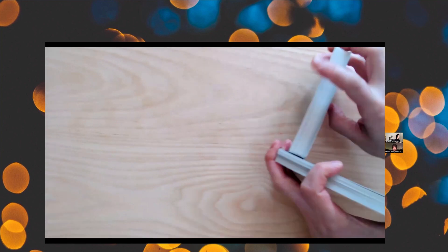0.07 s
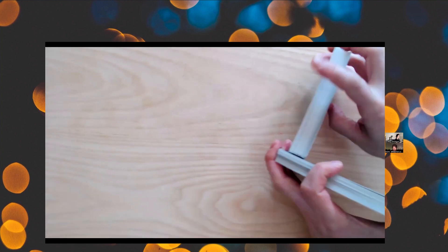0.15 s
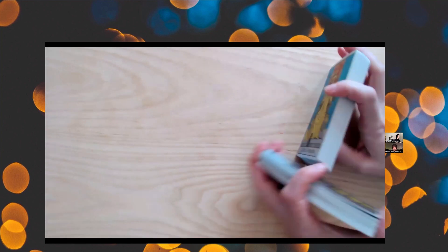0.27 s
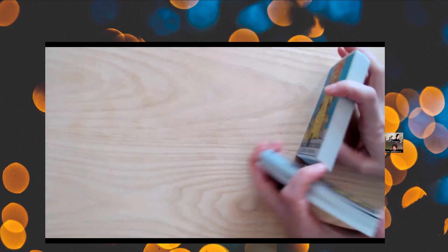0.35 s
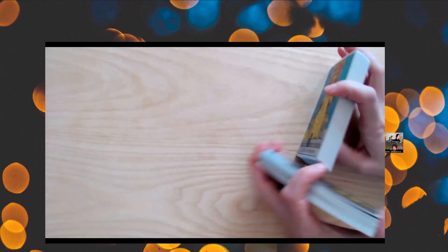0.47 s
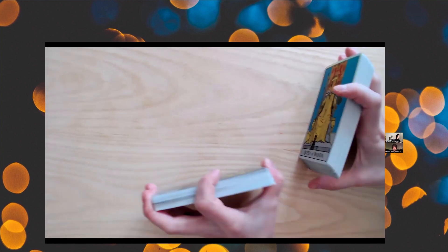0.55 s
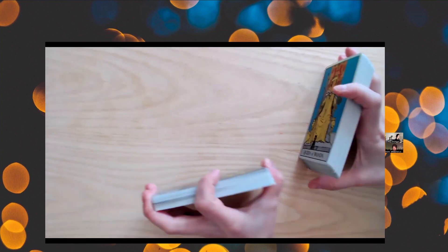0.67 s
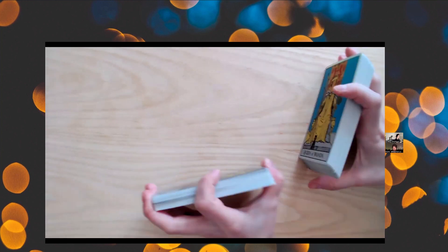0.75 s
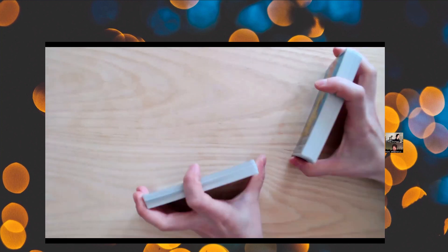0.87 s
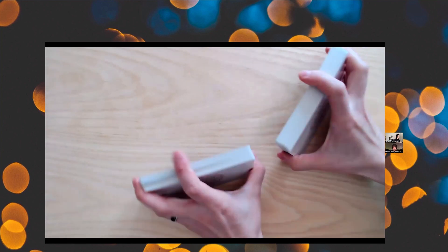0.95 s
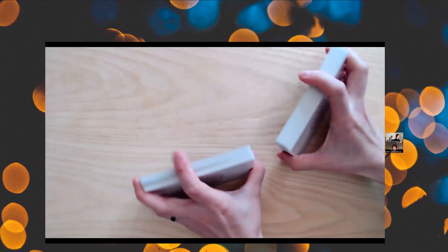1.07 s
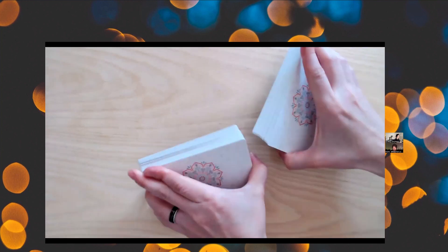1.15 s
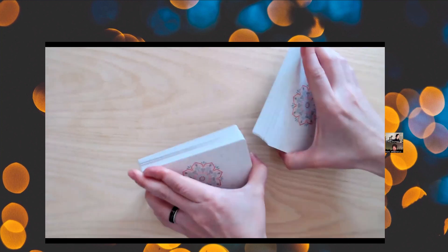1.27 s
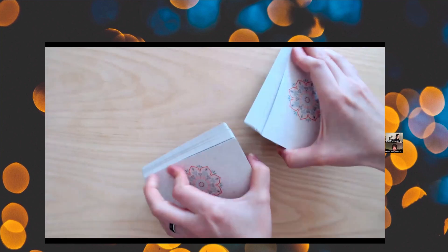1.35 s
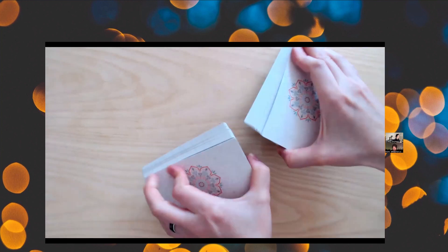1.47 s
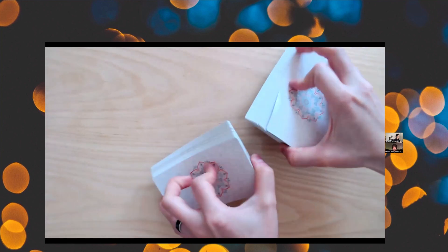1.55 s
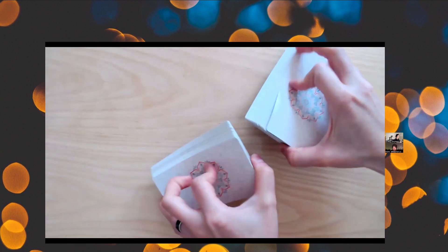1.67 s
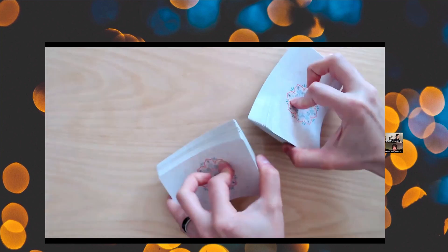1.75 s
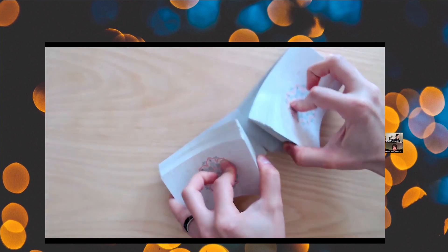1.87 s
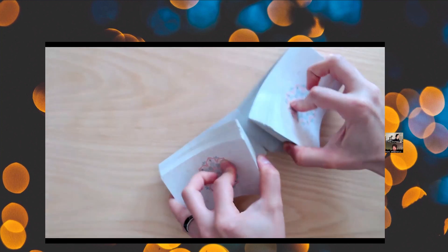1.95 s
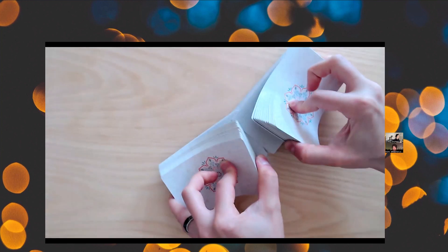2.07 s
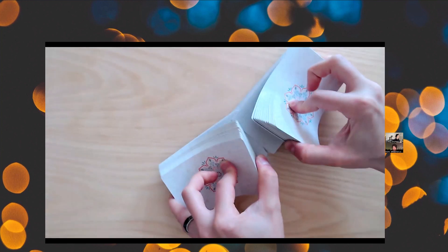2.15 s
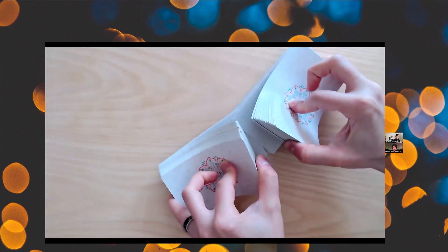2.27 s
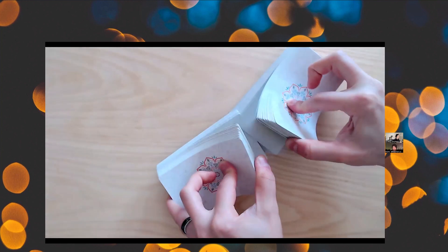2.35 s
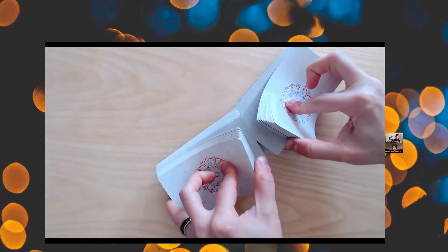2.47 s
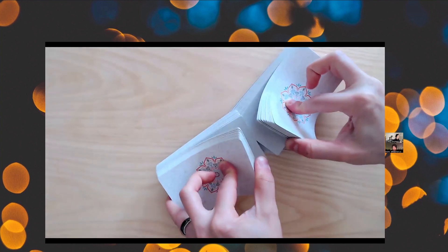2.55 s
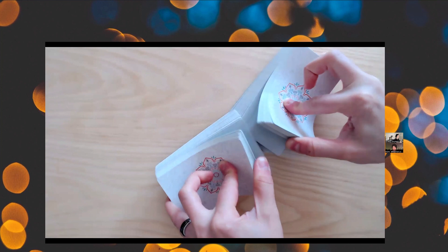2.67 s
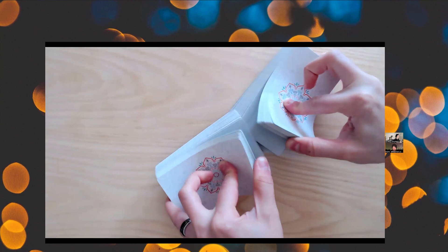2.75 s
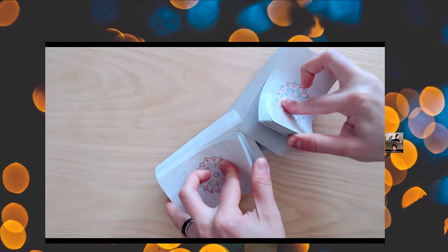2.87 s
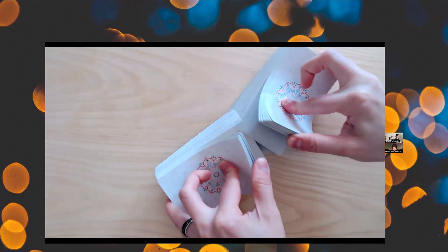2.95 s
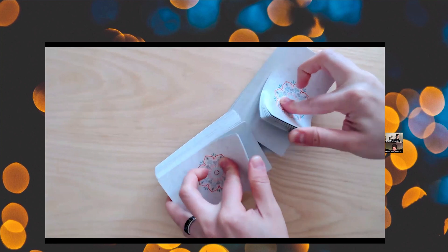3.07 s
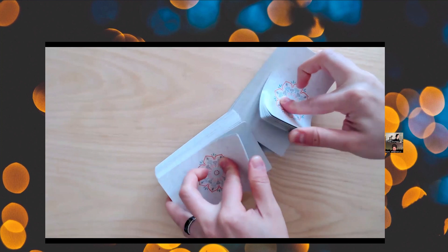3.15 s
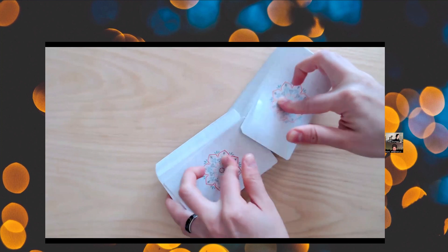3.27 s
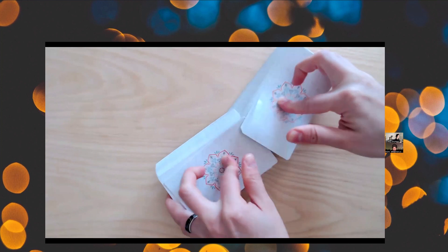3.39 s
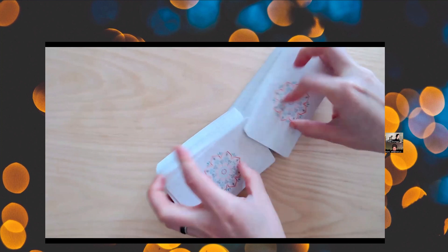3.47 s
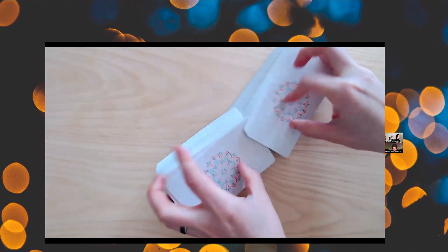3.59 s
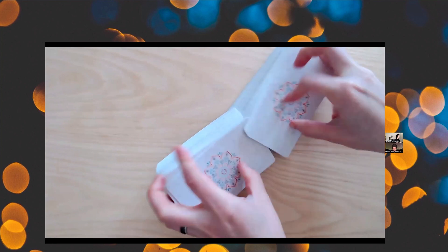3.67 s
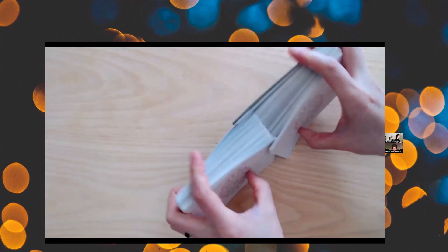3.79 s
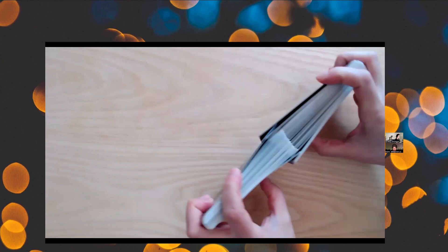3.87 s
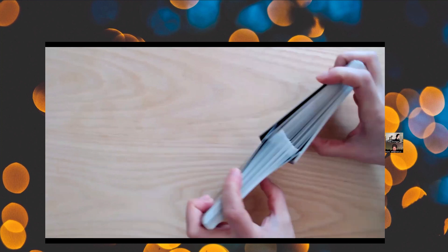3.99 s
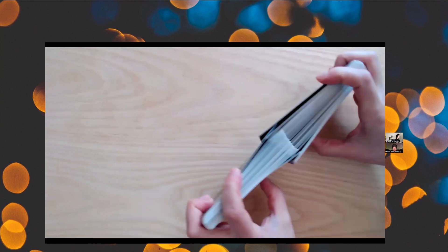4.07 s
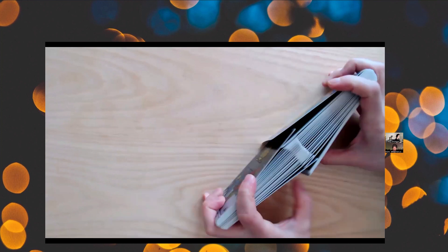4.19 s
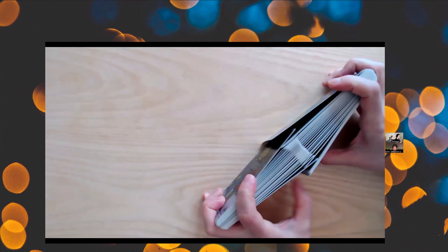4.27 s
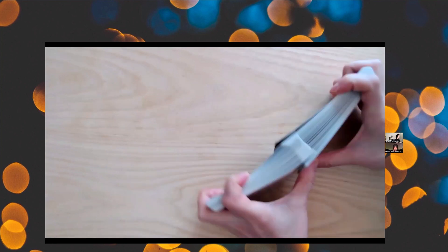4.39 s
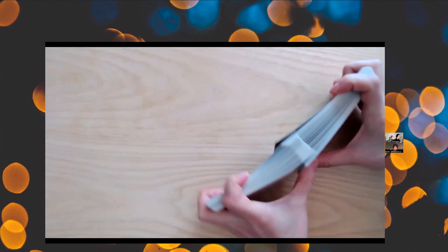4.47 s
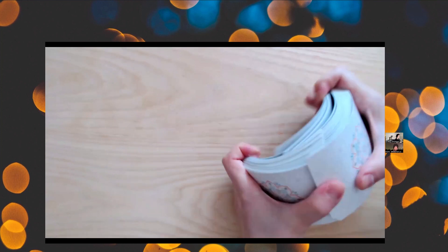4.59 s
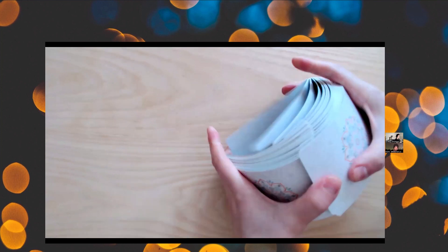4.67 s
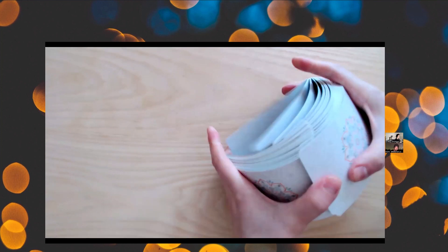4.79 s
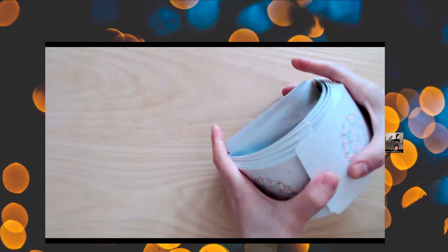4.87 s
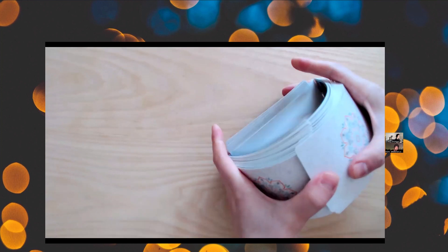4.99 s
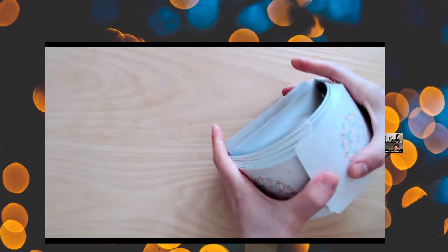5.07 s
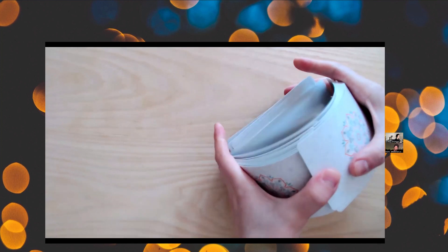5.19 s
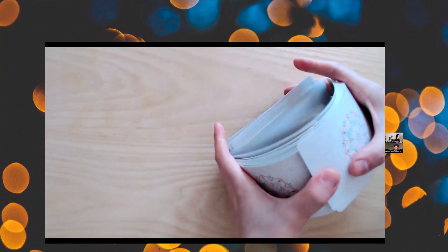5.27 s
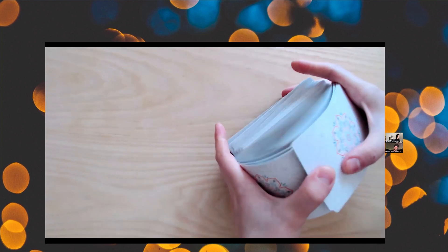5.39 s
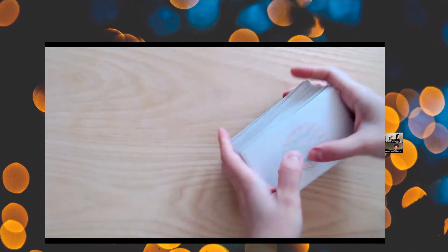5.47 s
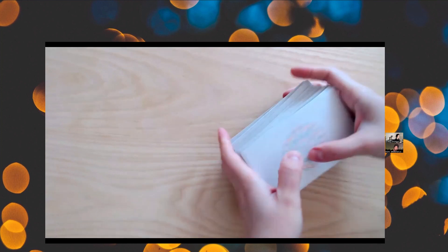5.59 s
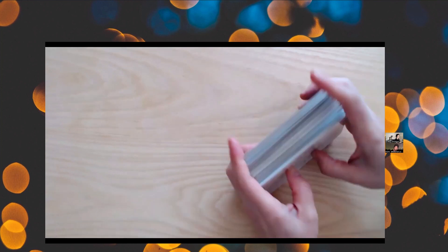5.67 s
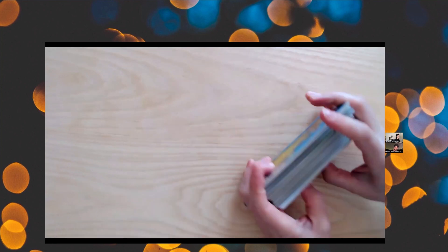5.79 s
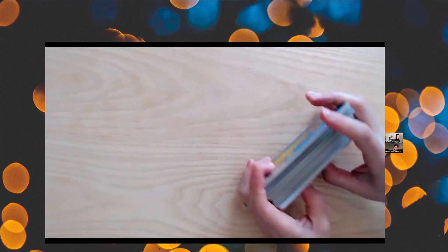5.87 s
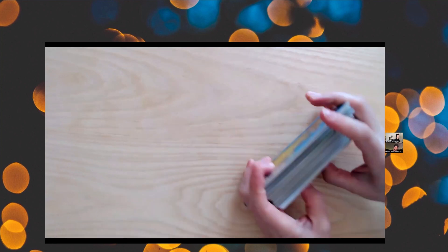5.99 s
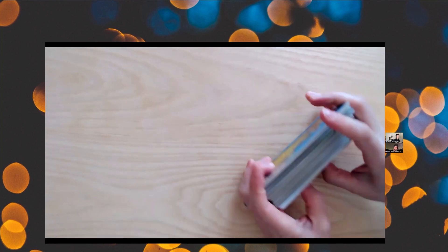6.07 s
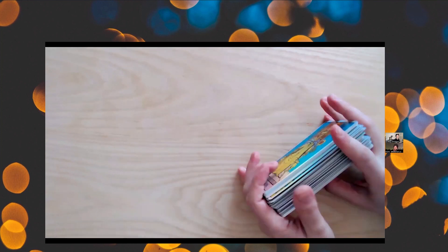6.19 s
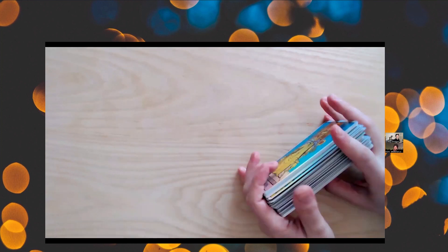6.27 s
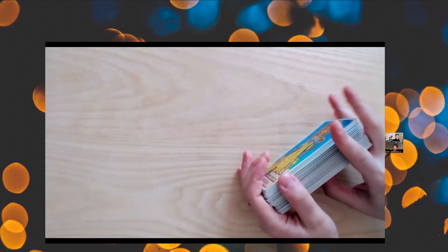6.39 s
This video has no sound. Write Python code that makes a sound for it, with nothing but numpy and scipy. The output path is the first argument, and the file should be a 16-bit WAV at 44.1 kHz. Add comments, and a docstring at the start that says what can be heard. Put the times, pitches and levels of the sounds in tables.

```python
"""A small bare room with a wooden table: large cards are cut, riffled and squared close to the microphone.
Card edges snap and packs knock: short rattles of noise ringing flaps of air and card stock, with thuds
from the modes of the table top. Faces slide as grainy shaped noise, chirp as wavering tones, and air
swishes through the bowed deck as resonant noise. Sparse reflections answer all of it."""
import sys
import numpy as np
from scipy import signal
from scipy.fft import rfft, irfft
from scipy.io import wavfile
from scipy.ndimage import uniform_filter1d

SR = 44100
rng = np.random.default_rng(int(sys.argv[2]) if len(sys.argv) > 2 else 0)


def store_pcm(level_fs):
    """Save levels as 16-bit WAV."""
    pcm = np.round(np.clip(level_fs, -1, 1) * 32767).astype(np.int16)
    wavfile.write(sys.argv[1], SR, np.atleast_2d(pcm).T)


N = 284004


def amp(db):
    """Decibels to gain."""
    return 10 ** (np.asarray(db) / 20)


def evened(x):
    """Scales to rms 1."""
    return x / np.sqrt(np.mean(x ** 2) + 1e-20)


def peaked(x):
    """Scales to peak 1."""
    return x / (abs(x).max() + 1e-12)


def read(points, hz):
    """Reads a frequency table on a log-frequency axis."""
    f, value = np.transpose(points)
    return np.interp(np.log(hz + 1), np.log(f + 1), value)


def lowpass(x, order, hz):
    """Rolls off the treble above a corner frequency."""
    return signal.sosfilt(signal.butter(order, hz, output="sos", fs=SR), x)


def ring(x, hz, width):
    """A steep resonance of gain near 1 at its centre: the same pole pair passed twice."""
    r = np.exp(-np.pi * width / SR)
    poles = [1 - r, 0, -r * (1 - r), 1, -2 * r * np.cos(2 * np.pi * hz / SR), r * r]
    return signal.sosfilt([poles, poles], x)


RISE_DB_PER_S, FALL_DB_PER_S = 434.5, 100


def gesture(start, hold, fall):
    """A hand movement in dB: straight attack, hold and release."""
    t = np.arange(N) / SR - start
    return np.minimum(RISE_DB_PER_S * t, 0) - fall * np.maximum(t - hold, 0)


# how long the bare room rings: (f/Hz, t60/s)
ROOM_DECAY = [(100, 0.23), (300, 0.61), (1000, 0.49), (3000, 0.42), (6000, 0.6), (12000, 0.19)]


def room(x):
    """Sparse reflections that build up over the first walls, each band dying at its own speed."""
    taps = np.zeros(SR)
    at = np.arange(150, SR - 20, 20)
    taps[at + rng.integers(0, 20, len(at))] = rng.choice([-1., 1.], len(at))
    taps *= 1 - 0.72 * np.exp(-(np.arange(SR) / SR / 0.03) ** 6)  # the walls answer late
    hz, t, z = signal.stft(taps, SR, nperseg=256)
    decay = amp(-60 * t / read(ROOM_DECAY, hz)[:, None])
    tail = signal.istft(z * decay, SR, nperseg=256)[1]
    return signal.fftconvolve(x, tail / np.linalg.norm(tail))[:N]


# low modes of the wooden table top: (f/Hz, level/dB, t60/s)
TABLE_MODES = [(73.4, -31, 0.18), (123.6, -9.5, 0.39), (146.3, -7, 0.13), (186.2, -8.5, 0.099),
               (237, -10, 0.21), (298, -2, 0.032), (361.7, 1.5, 0.056), (449, -2.5, 0.037),
               (547, -4, 0.061), (720, -8, 0.043), (861, -0.5, 0.1)]


def table(push):
    """Soft pushes ring the low modes of the table top."""
    t = np.arange(SR // 3) / SR
    modes = sum(amp(db - 60 * t / t60) * np.sin(2 * np.pi * hz * t) for hz, db, t60 in TABLE_MODES)
    thud = peaked(np.convolve(modes, np.hanning(48)))  # a rounded push dulls the thud
    return signal.oaconvolve(push, thud)[:N]


# a palm or the flat of the deck bumps the table: (t/s, push level/dB)
BUMP_TIMES = [(3.409, -46), (3.722, -37), (3.737, -44), (5.555, -38), (5.57, -38), (5.596, -27.5),
              (6.268, -39)]
BUMP_MS = 3.2  # a soft contact stirs only the lowest modes


def bumps():
    """Slow rounded pushes on the table top."""
    push, t = np.zeros(N), np.arange(0, BUMP_MS / 1000, 1 / SR)
    shape = np.sin(np.pi * t * 1000 / BUMP_MS) ** 2
    for s, db in BUMP_TIMES:
        push[round(s * SR):][:len(t)] += amp(db) * 2 * shape / shape.sum()
    return table(push)


# the two runs of falling cards, riffle then bridge:
# (t/s, effort level/dB, treble hiss level/dB, hand weight level/dB)
CARD_RUNS = [
    [(1.68, -53.5, -38.5, -73.5), (1.72, -43, -36, -56), (1.79, -45, -40.5, -56), (1.83, -47, -42, -38),
     (1.94, -45.5, -46, -40.5), (2.03, -48, -47, -34.5), (2.07, -51, -48.5, -44), (2.11, -45, -43.5, -36.5),
     (2.26, -48, -39, -42), (2.34, -48.5, -41.5, -35), (2.42, -41, -41, -43), (2.47, -58, -39.5, -72),
     (2.55, -41, -38.5, -55), (2.62, -52.5, -42.5, -51), (2.68, -50.5, -45, -62), (2.74, -45.5, -39.5, -36),
     (2.83, -66, -44.5, -45), (2.86, -38, -39, -42), (2.93, -57, -39, -44), (2.98, -40, -35.5, -32),
     (3.01, -47, -35.5, -43), (3.1, -46.5, -38, -29), (3.12, -46.5, -40.5, -43)],
    [(4.41, -61, -72, -45), (4.45, -57, -35.5, -53), (4.6, -52, -41, -39), (4.69, -57, -41, -48),
     (4.76, -42.5, -42, -37.5), (4.84, -50, -38, -53.5), (4.88, -44.5, -40.5, -34.5),
     (4.95, -50.5, -38.5, -46), (5.01, -43, -39, -37.5), (5.11, -41, -40.5, -38.5), (5.2, -44, -37.5, -40),
     (5.24, -42, -40, -41), (5.33, -40, -38.5, -44.5)],
]


def runs(column, chosen=CARD_RUNS):
    """One column of the runs as gain, rising and dying like any gesture."""
    out = 0
    for rows in chosen:
        s, db = np.array(rows)[:, [0, column]].T
        course = np.interp(np.arange(N) / SR, s, db)
        out = out + amp(course + gesture(s[0], s[-1] - s[0], FALL_DB_PER_S))
    return out


def grainy(points, patchy_db, grain_db):
    """Friction noise: uneven grains of contact, coloured by a spectrum with drifting patches."""
    grains = amp(grain_db * evened(uniform_filter1d(rng.standard_normal(N), 60)))
    hz, _, z = signal.stft(grains * rng.standard_normal(N), SR, nperseg=512)
    drift = uniform_filter1d(rng.standard_normal(z.T.shape), 8, 0)  # smooth in time
    patches = evened(uniform_filter1d(drift, 8, 1)).T  # and in frequency
    colour = amp(read(points, hz)[:, None] + patchy_db * patches)
    return evened(signal.istft(z * colour, nperseg=512)[1][:N])


HAND_HZ = 276  # flesh passes little above this
NUDGE_SPREAD_DB, NUDGES_PER_S = 2.5, 250


def hand_weight():
    """Flesh nudges the table at random instants: a dull steady rumble of rms 1."""
    sizes = amp(NUDGE_SPREAD_DB * rng.standard_normal(N))
    nudges = rng.standard_normal(N) * sizes * (rng.random(N) < NUDGES_PER_S / SR)
    return evened(table(lowpass(nudges, 2, HAND_HZ)))


# colour of rubbing faces: (f/Hz, spectral level/dB)
RUB_COLOUR = [(180, -86), (300, -33), (600, -11), (850, -11.5), (1030, 2), (1560, 7), (1830, 6.5),
              (2570, 2.5), (3140, 2.5), (4000, -7.5), (9000, -56.5), (11700, -102), (19800, -120)]
# colour of fast sliding: (f/Hz, spectral level/dB)
HISS_COLOUR = [(500, -46.5), (1200, -30), (1800, -1), (3000, -3), (5000, -1.5), (8000, -7.5), (12000, -13),
               (14000, -20.5), (15500, -26)]
# bent cards sliding home in the bridge have their own colour: (f/Hz, spectral level/dB)
BRIDGE_COLOUR = [(500, -27), (1200, -20), (1800, -3), (3300, -8), (5000, -1.5), (9600, -7), (12900, -10.5),
                 (15000, -24)]
# hands move the cards: (start t/s, hold/s, rub level/dB, treble hiss level/dB, hand weight level/dB)
HAND_STROKES = [(-.05, 0.053, -56, -90, -44), (0.079, 0.019, -47, -101.5, -53.5),
                (0.413, 0.047, -48, -90, -48), (0.71, 0.036, -66, -100, -54),
                (0.786, 0.021, -90, -74.5, -85), (0.86, 0.052, -82, -107, -65.5),
                (1.035, 0.04, -69.5, -84.5, -99), (1.127, 0.14, -67, -71.5, -100),
                (1.315, 0.034, -64, -102, -110), (1.578, 0.0086, -118, -107, -74),
                (3.378, 0.03, -69, -65.5, -58), (3.462, .04, -80, -94, -61.5), (3.545, 0.03, -68, -99, -60),
                (3.615, .03, -94, -105, -62), (3.732, .02, -60, -81, -45),
                (3.856, 0.018, -42.5, -53.5, -41), (4.075, 0.031, -49.5, -50, -50),
                (4.282, 0.052, -55.5, -44, -53), (5.567, 0.063, -60, -63, -48),
                (5.78, 0.12, -49.5, -75, -51), (6.081, 0.062, -57.5, -100, -55.5),
                (6.274, 0.088, -70, -100, -57), (6.395, .1, -67, -76.5, -58.5)]
WEIGHT_FALL_DB_PER_S = 160.5
RUN_RUB_DB = 4  # rub over the effort of a run


def slides():
    """Rubbing faces, the hiss of fast sliding, and hands leaning on the table."""
    falls = np.array([FALL_DB_PER_S, FALL_DB_PER_S, WEIGHT_FALL_DB_PER_S])[:, None]
    rub, hiss, weight = sum(amp(np.array(dbs)[:, None] + gesture(s, hold, falls))
                            for s, hold, *dbs in HAND_STROKES)
    rub = rub + amp(RUN_RUB_DB) * runs(column=1)
    riffle, bridge = (runs(column=2, chosen=[rows]) for rows in CARD_RUNS)
    weight = weight + runs(column=3)
    out = rub * grainy(RUB_COLOUR, patchy_db=3.5, grain_db=3.0)
    out += (hiss + riffle) * grainy(HISS_COLOUR, patchy_db=2.5, grain_db=1.5)
    out += bridge * grainy(BRIDGE_COLOUR, patchy_db=1.4, grain_db=1.0)
    return out + weight * hand_weight()


# the deck is bowed into a bridge and air swishes in the gap:
# (start t/s, hold/s, level/dB, gap f/Hz at the start, overtone level/dB re gap)
GAP_SWISHES = [(4.268, 0.1, -48, 2623, -9), (4.449, 0.026, -41, 2165, -2.5)]
GAP_SAG_HZ_PER_S, SWISH_FALL_DB_PER_S = 2500, 402


def swish():
    """Air noise in the sagging resonance of the gap and in its overtone."""
    t, out = np.arange(N) / SR, 0
    for s, hold, db, hz, over_db in GAP_SWISHES:
        gap = hz - GAP_SAG_HZ_PER_S * np.clip(t - s, 0, .2)
        for times, rel_db, width in ((1, 0, 656), (2.1, over_db, 905)):
            turn = np.exp(2j * np.pi * np.cumsum(times * gap) / SR)
            slow = lowpass(rng.standard_normal((2, N)), 3, width / 2)
            tone = evened((turn * (slow[0] + 1j * slow[1])).real)  # noise band carried to the gap pitch
            out = out + amp(db + rel_db + gesture(s, hold, SWISH_FALL_DB_PER_S)) * tone
    return out


# a card face sticks and slips under pressure and chirps:
# (start t/s, length/s, fundamental level/dB, slip f/Hz, level/dB of overtones 2, 3, 4 re fundamental)
SLIP_CHIRPS = [(3.865, .016, -29.5, 882, -26.5, -27, -23), (4.053, 0.015, -28, 1020, 5, -14, -4.5),
               (4.062, 0.011, -26, 745, -9, 0.5, -17)]
CHIRP_WAVER, CHIRP_PEAK = .025, 1  # rms wander as a share of slip rate; under 1 the swell comes early


def chirps():
    """Short swells of a slightly wavering slip tone and its overtones."""
    out = np.zeros(N)
    for s, length, db, hz, *over_db in SLIP_CHIRPS:
        t = np.arange(0, length, 1 / SR)
        waver = evened(uniform_filter1d(rng.standard_normal(2048), size=90))[:len(t)]
        turn = 2 * np.pi * np.cumsum(hz * (1 + CHIRP_WAVER * waver)) / SR
        tone = sum(amp(part_db) * np.cos((k + 1) * turn) for k, part_db in enumerate([0, *over_db]))
        swell = np.sin(np.pi * (t / length) ** CHIRP_PEAK)
        out[round(s * SR):][:len(t)] += amp(db) * swell * tone
    return out


RUN_FLUTTER_DB, SLAPS_PER_S = 1, 170  # flutter over the effort of a run; average slap rate


def flutter():
    """Small random slaps of the falling cards, each at one of twelve flap pitches."""
    t = np.arange(N) / SR
    inside = sum((t > rows[0][0]) & (t < rows[-1][0]) for rows in CARD_RUNS)
    level = amp(RUN_FLUTTER_DB) * inside * runs(column=1)
    size = amp(4.5 * np.minimum(rng.exponential(1, N), 2.2)) * (rng.random(N) < SLAPS_PER_S / SR)
    flap, out = rng.integers(0, 12, N), np.zeros(N)
    u = np.arange(400) / SR / 0.00034
    for k, hz in enumerate(np.geomspace(600, 3600, num=12)):
        slap = ring(u * np.exp(-2 * u) * rng.standard_normal(400), hz, 1820)
        out += signal.oaconvolve(size * (flap == k), peaked(slap))[:N]
    return level * evened(out)


# resonances of the stiff card stock: (f/Hz, width/Hz, level/dB)
CARD_STOCK = [(444, 326, 0.5), (777, 900, 3.5), (1050, 24, 6.5), (1500, 35, -2.5), (2170, 160, 4.5),
              (2450, 294, 5), (2960, 1430, -3), (4330, 370, -1), (5040, 180, -4.5)]


def deck(x):
    """The fixed resonances of the card stock."""
    return sum(amp(db) * ring(x, hz, width) for hz, width, db in CARD_STOCK)


def contact(shape, noise):
    """A short rattle of contact under the given envelope, with a nearly even spectrum."""
    burst = shape * noise
    for _ in range(2):
        flat = irfft(np.exp(1j * np.angle(rfft(burst))))  # keep the phases, level the spectrum
        burst = np.sqrt(shape) * flat
    return burst


VARY_CONTACT, VARY_CRACK_DB = 0.14, 0.5  # spread from blow to blow: log contact time, crack level
CRACK_AFTER_MS = 1.0  # the face lands just after the edge touches


def blows(rows, kind, crack_db):
    """Each blow is a rattle of contact through the flaps of air under the card, and a push on the table."""
    out, push, t = np.zeros(N + 2048), np.zeros(N), np.arange(2048) / SR * 1000
    treble = signal.butter(2, [3600, 10000], "band", output="sos", fs=SR)
    contact_ms, q, softness, fade_hz = kind
    for s, db, hz, low_hz, low_db, scuff_db, thud_db, card_db in rows:
        noise = rng.standard_normal(2048)
        u = t / (contact_ms * np.exp(VARY_CONTACT * rng.standard_normal()))
        burst = contact(u ** softness * np.exp(-u * (1 + softness)), noise)
        crack = amp(crack_db + VARY_CRACK_DB * rng.standard_normal()) * np.linalg.norm(burst)
        burst[round(CRACK_AFTER_MS * SR / 1000)] += crack * rng.choice([-1, 1])
        upper = ring(burst, hz, hz / q)
        lower = amp(low_db) * ring(burst, low_hz, 3 * low_hz / q)
        flaps = upper + lower + amp(card_db) * deck(burst)
        # the edge scuffs a little longer than it slaps
        scuff = signal.sosfilt(treble, u ** 0.52 * np.exp(-.7 * u) * noise)
        at = round(s * SR)
        out[at:at + 2048] += amp(db) * (peaked(lowpass(flaps, 2, fade_hz)) + amp(scuff_db) * peaked(scuff))
        push[at + 20] += amp(db + thud_db) * rng.choice([-1, 1])
    return out[:N] + table(push)


# a pack of cards knocks the table or the other pack: (t/s, flap peak level/dB, upper flap f/Hz,
# lower flap f/Hz, then level/dB of lower flap, edge scuff, table thud, card ring)
PACK_KNOCKS = [(0.059, -21, 2850, 1320, -5, -48, -35, -11), (0.061, -19, 2850, 1890, -2, -42, -45, -9),
               (0.063, -24, 1050, 414, -1, -29, -20, -8), (0.068, -30, 2860, 1880, 1, -40, -29, -17),
               (0.326, -33.5, 1020, 432, -8, -55, -23, -22), (0.331, -30, 1630, 417, 4, -56, -7, -15),
               (0.403, -22, 1560, 500, -15, -53, -10, -28), (0.407, -28.5, 1740, 590, -7, -52, -31, -33),
               (0.419, -32, 1050, 464, -7, -49, -20, -31), (0.429, -29, 2150, 1010, 1, -48, -5, -4),
               (0.434, -36, 1800, 990, 2, -45, -20, -8.5), (0.444, -27.5, 2200, 1050, -3, -41, -24, -24),
               (0.453, -31, 1400, 453, -8, -43, -33, -14), (0.465, -30, 1730, 1010, -6, -51, -2.5, -30),
               (0.773, -41, 1500, 430, -10, -30, -3.5, -9), (1.611, -45.5, 2070, 1340, -15, 1.5, -20, -25),
               (1.627, -22.5, 3300, 457, -23, -9, -6.5, -8), (3.375, -30, 1600, 1330, 7, -11.5, -21, -2),
               (3.545, -47.5, 2100, 1300, -6, -30, -8, -4), (3.705, -41, 1570, 430, -2, -38, 8, -2),
               (3.721, -35, 2080, 1260, 4, -45, -3.5, -11), (3.74, -35.5, 2600, 1500, 12, -38, 5, -7),
               (3.83, -19.5, 1590, 1040, -6, -34, -12, -8.5), (3.833, -25, 3020, 1460, -5, -32, -21, -22),
               (3.857, -16.5, 1660, 1060, -5, -20, -26, -9.5),
               (3.859, -13, 2700, 1690, -1, -33, -34, -17.5), (3.861, -21, 1630, 990, 2, -36, -30, -9),
               (3.864, -18.5, 4300, 890, -10, -38, -39, -29), (4.045, -25.5, 1110, 513, -8, -30, -19, -5),
               (4.048, -29, 2200, 1010, 4, -30, -17, -10), (4.051, -26.5, 1140, 510, 0, -21, -18, -10),
               (4.057, -24, 1380, 640, -10, -16, -10, -7), (4.061, -19, 1280, 640, -1, -35, -33, -7),
               (4.074, -23, 2110, 700, -14, -40, -19, -18), (4.08, -28, 2300, 770, 6, -40, 7, -29),
               (5.547, -33.5, 3350, 1330, -10, -24, -15, -7),
               (5.551, -24.5, 3460, 1320, -2.5, -21, -13, -1), (5.568, -59, 1500, 406, 4, -38, -5, -16),
               (5.595, -35, 1710, 360, 3, -24, 6.5, 3), (5.749, -42.5, 1880, 357, 13, -13, 13.5, -18),
               (5.772, -23.5, 1890, 403, -3, -45, -7, -18), (5.782, -26, 1850, 1200, -10, -40, -30, -7),
               (5.785, -25, 3120, 1850, 4, -38, -26, -10), (5.804, -30, 1900, 1050, 6, -38, -24, -20),
               (5.826, -25.5, 3270, 1860, -1.5, -25, -8, -7), (5.841, -29, 1890, 430, -15, -28, -3, -3),
               (5.896, -32, 1960, 1280, 13, -40, -2.5, -22), (5.958, -28.5, 1880, 960, -3, -48, -7, -38),
               (6.084, -38.5, 1350, 604, 2, -44, -26, -19), (6.094, -38.5, 1790, 520, 9, -33, -25, -29),
               (6.113, -32, 1880, 590, -7, -50, -29, -5.5), (6.398, -31.5, 1870, 940, 0.5, -46.5, -29, -15)]
# build of a pack: (typical contact time/ms, flap f over width, softness of the rise, flaps fade above f/Hz)
PACK_BUILD = (3.2, 5.4, 0.19, 3160)
KNOCK_CRACK_DB = 0.5  # the crack, a single sharp instant just after contact begins, over the whole rattle


def knocks():
    """Packs land with a longer, duller rattle than single cards."""
    return blows(PACK_KNOCKS, PACK_BUILD, KNOCK_CRACK_DB)


# a card edge slips off a thumb and slaps down:
# (t/s, flap peak level/dB, upper flap f/Hz, lower flap level/dB, edge scuff level/dB)
CARD_SNAPS = [(1.677, -9, 2620, -15, -10), (1.707, -20, 2510, -10, -11), (1.789, -18.5, 2540, -24, -27),
              (1.824, -15, 2370, 1, -24), (1.85, -22.5, 1520, 6, -22), (1.89, -15, 1280, -10, -17),
              (1.914, -17, 1410, -17, -33), (1.973, -20.5, 2300, -26.5, -18), (1.993, -21, 1500, -5, -29),
              (2.021, -21.5, 2430, 7, -23), (2.081, -20.5, 2700, 11, -24), (2.096, -20, 1370, 0, -36),
              (2.108, -14.5, 2400, 8, -12.5), (2.134, -21.5, 2180, -18, -26), (2.171, -18.5, 2060, -15, -7),
              (2.193, -20, 2450, 21, -34), (2.203, -18.5, 2370, -14, -10), (2.223, -26, 3000, -3, -25),
              (2.232, -35, 1800, 4, -20), (2.242, -17, 2380, -7, -8), (2.253, -35, 1500, -6, -24),
              (2.275, -18.5, 2370, -30, -13), (2.282, -26, 2500, -9, -24), (2.289, -12.5, 2500, -4, -23),
              (2.318, -13, 2550, 0, -13.5), (2.36, -26, 2000, 9.5, -24), (2.382, -11, 1960, -11, -25),
              (2.388, -23.5, 2130, 1, -27), (2.412, -11.5, 2450, -10, -10.5), (2.498, -11, 1500, -6.5, -27),
              (2.512, -13.5, 2280, -2, -14), (2.516, -7.5, 2450, -3.5, -21), (2.547, -18, 1500, -20, -13),
              (2.603, -28, 1300, -22, -33), (2.613, -18, 2450, -5, -28), (2.642, -16, 2400, 3, -25),
              (2.696, -23, 1740, 0, -30), (2.704, -21, 1190, -11, -32), (2.731, -28, 1500, -16, -14),
              (2.737, -15.5, 1330, -3.5, -28), (2.769, -18, 2650, -5, -7.5), (2.798, -35, 1500, -5, -22),
              (2.813, -20, 2600, -5, -7.5), (2.854, -16.5, 1750, -9, -22), (2.86, -12.5, 3660, -16, -9),
              (2.866, -18.5, 2220, -21, -30), (2.912, -21.5, 1250, -4, -27), (2.937, -29, 3460, -18, -12),
              (2.952, -15.5, 1530, -15, -14), (2.963, -12, 1250, -34, -10), (2.978, -18, 1340, -13, -19),
              (2.984, -27, 1500, 0, -25), (3.029, -20.5, 1310, -17, -17), (3.036, -17, 1610, -5, -22),
              (3.071, -16.5, 4500, 1, -18), (3.075, -15.5, 1520, 0, -25), (3.092, -29, 2180, -6, -15),
              (3.097, -12.5, 2120, 31, -35), (4.503, -15.5, 2100, -2, -12), (4.507, -21.5, 1500, -8, -18),
              (4.521, -16.5, 2670, -9, -9), (4.547, -19.5, 1720, -7, -28), (4.579, -28, 1800, -6, -15),
              (4.6, -20, 2130, 0.5, -15.5), (4.662, -30, 2000, -18, -13.5), (4.689, -29, 1500, -4, -18),
              (4.713, -25.5, 2380, 10, -8.5), (4.735, -14.5, 1700, 21, -15), (4.758, -13.5, 1400, -4, -25),
              (4.788, -22, 1620, -26, -6), (4.8, -21.5, 2590, -16, -4.5), (4.863, -19.5, 2270, -7, -10),
              (4.876, -16, 1910, -11, -21), (4.889, -18.5, 1630, 7, -35), (4.902, -23, 1110, 7, -33),
              (4.908, -17.5, 2250, -22, -24), (4.928, -23, 2820, -3.5, -21), (4.935, -21.5, 3440, -17, -12),
              (4.938, -25, 1900, -12, -23), (4.968, -20, 3700, -6, -18), (4.992, -21, 1700, 6, -21),
              (5.002, -9, 2500, -3, -11), (5.009, -16, 2460, 1, -19), (5.028, -18, 1180, 9, -7),
              (5.036, -13.5, 1500, -5, -17), (5.064, -11, 1800, -1.5, -37), (5.09, -27, 1610, -7, -18),
              (5.1, -18.5, 2650, -13, -16), (5.115, -16, 1420, -3, -13.5), (5.129, -16, 1850, -13, -14),
              (5.14, -22.5, 1310, 8.5, -25), (5.15, -14.5, 1600, -17, -10), (5.158, -24, 2580, -9, -2),
              (5.176, -17.5, 2170, 6, -15), (5.209, -32.5, 1900, 7, -6), (5.226, -9, 1390, -46, -9),
              (5.266, -9.5, 2060, -25, -11), (5.315, -24, 1870, -21, -20.5)]
# build of one card: (typical contact time/ms, flap f over width, softness of the rise, flaps fade above f/Hz)
CARD_BUILD = (0.71, 2.34, 0.074, 18000)
SNAP_LOWER, SNAP_CRACK_DB = 0.4, 3.5  # lower flap pitch as a share of the upper; crack over the rattle
SNAP_THUD_DB, SNAP_CARD_DB = -14.5, -8.5  # average push on the table and card ring
VARY_THUD_DB, VARY_CARD_DB = 2.5, 5  # their spread from card to card


def snaps():
    """Single cards share one build; their ring and their push on the table vary by chance."""
    rows = []
    for s, db, hz, low_db, scuff_db in CARD_SNAPS:
        thud_db = SNAP_THUD_DB + VARY_THUD_DB * rng.standard_normal()
        card_db = SNAP_CARD_DB + VARY_CARD_DB * rng.standard_normal()
        rows.append((s, db, hz, SNAP_LOWER * hz, low_db, scuff_db, thud_db, card_db))
    return blows(rows, CARD_BUILD, SNAP_CRACK_DB)


def scene():
    """Knocks on the table fill the room most, snaps less; the soft sliding is heard mostly direct."""
    rubbing = slides() + swish()
    packs = knocks() + chirps() + bumps()
    cards = snaps() + flutter()
    echo = room(amp(-10.5) * cards + amp(-5.0) * packs + amp(-14) * rubbing)
    return (cards + packs + rubbing + echo)[None]


EDGE_HZ = 15040  # upper band limit


def record(dry):
    """The microphone loses deep bass and the highest treble; then the band limit."""
    cut = signal.sosfilt(signal.butter(2, 85, "high", output="sos", fs=SR), dry)
    cut = lowpass(cut, 4, 13500)
    edge = signal.firwin(511, EDGE_HZ, window=("kaiser", 9), fs=SR)
    return signal.oaconvolve(cut, edge[None], "same")


dry = scene()
out = record(dry)
store_pcm(out)
```